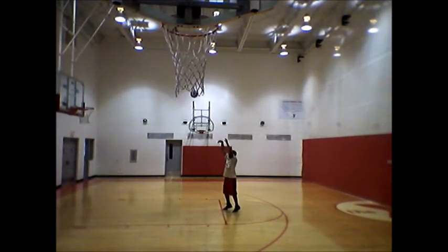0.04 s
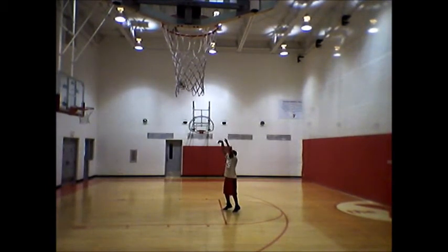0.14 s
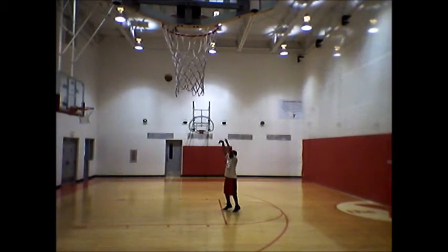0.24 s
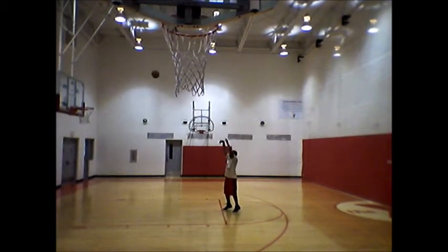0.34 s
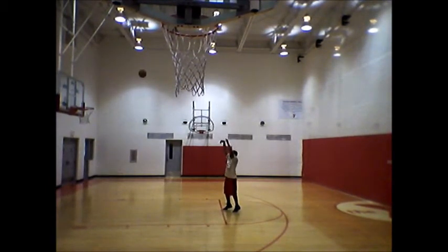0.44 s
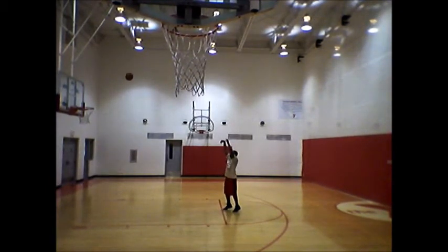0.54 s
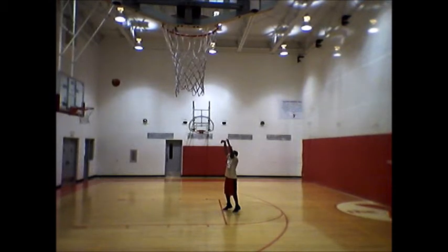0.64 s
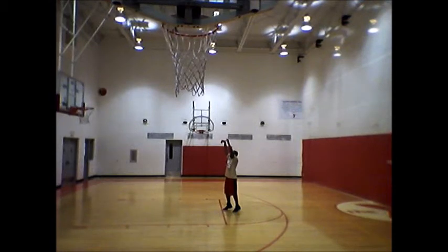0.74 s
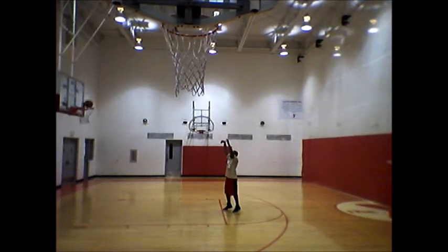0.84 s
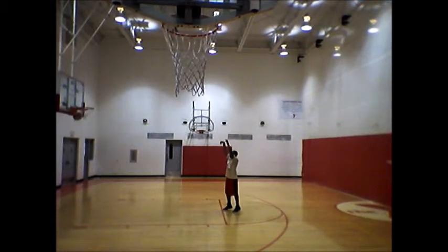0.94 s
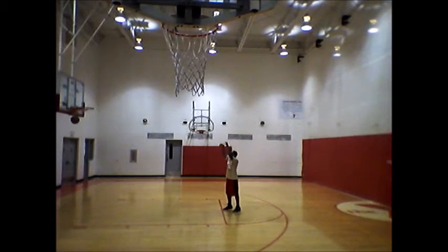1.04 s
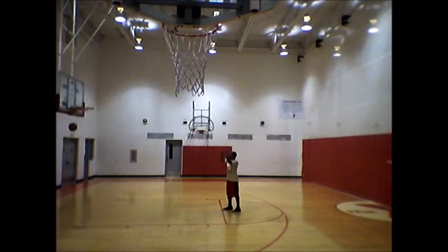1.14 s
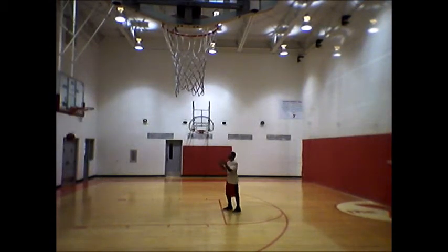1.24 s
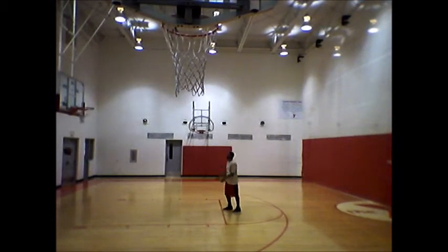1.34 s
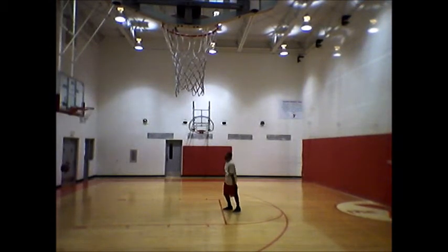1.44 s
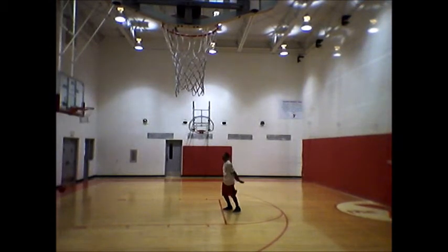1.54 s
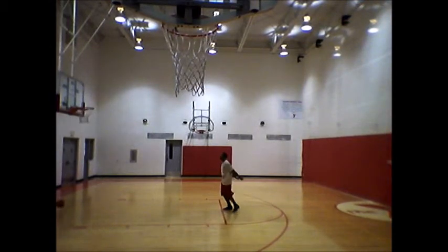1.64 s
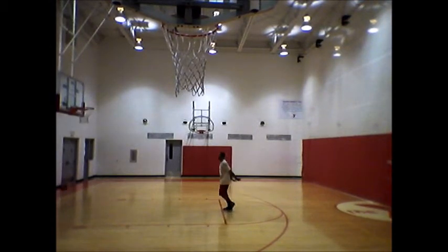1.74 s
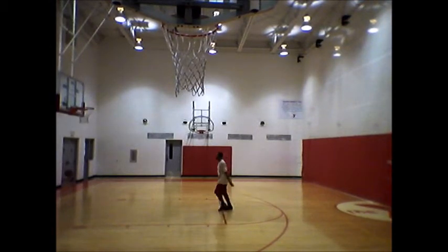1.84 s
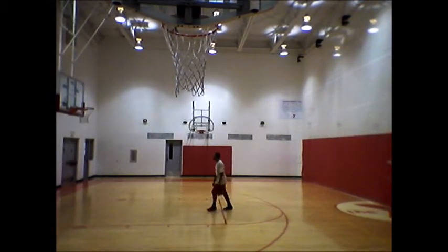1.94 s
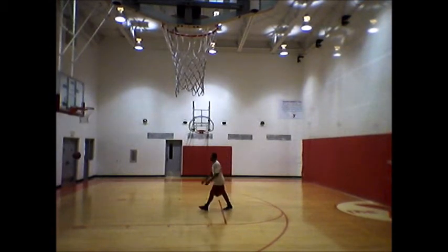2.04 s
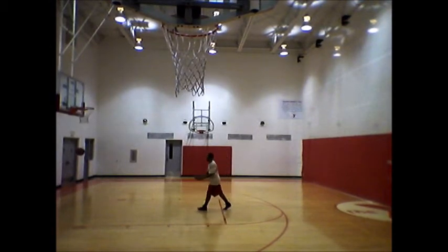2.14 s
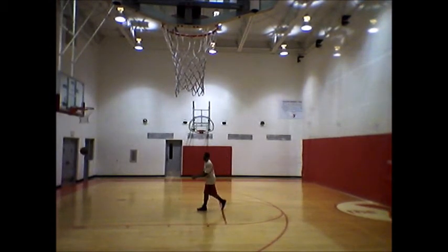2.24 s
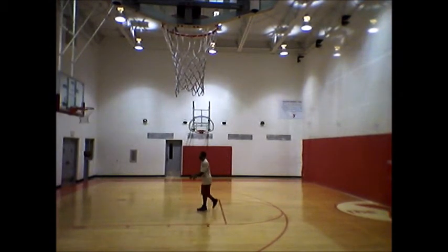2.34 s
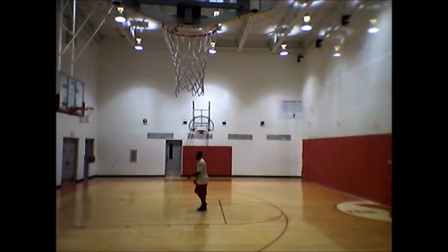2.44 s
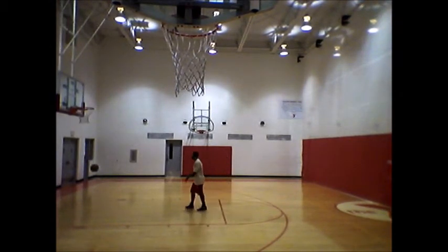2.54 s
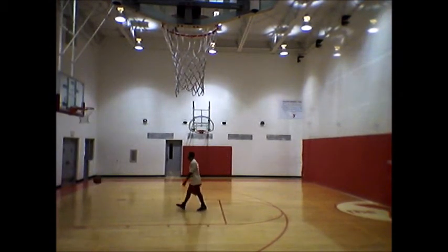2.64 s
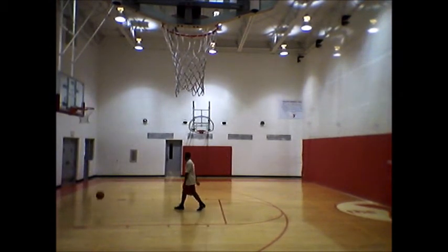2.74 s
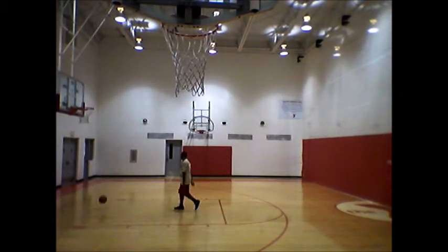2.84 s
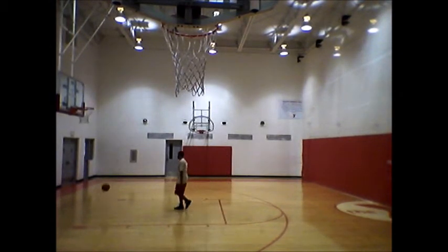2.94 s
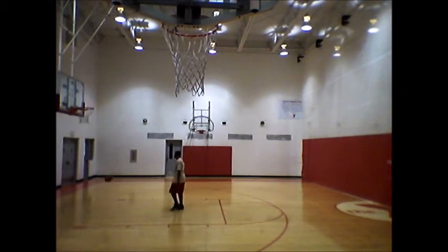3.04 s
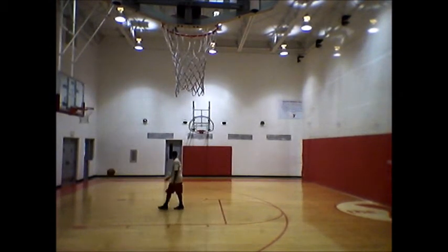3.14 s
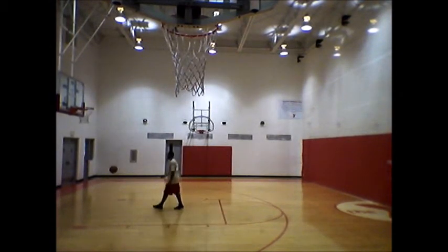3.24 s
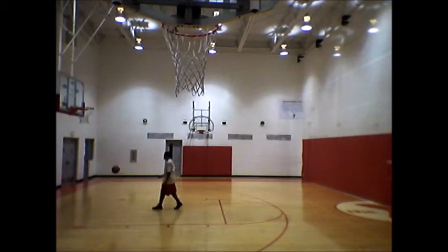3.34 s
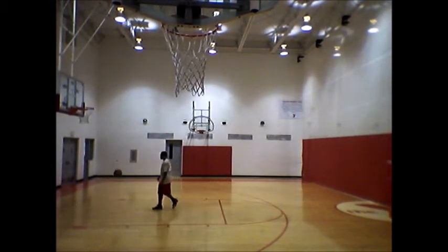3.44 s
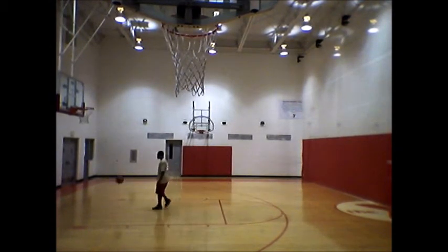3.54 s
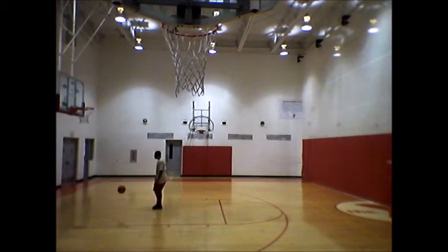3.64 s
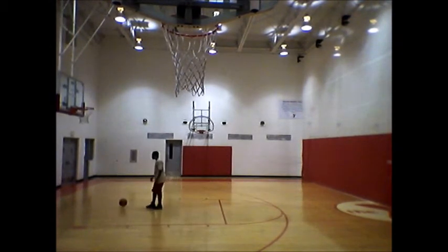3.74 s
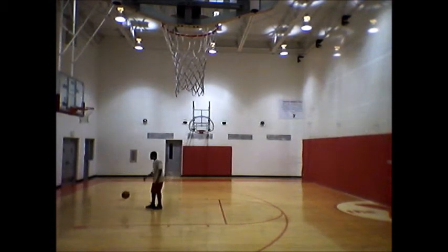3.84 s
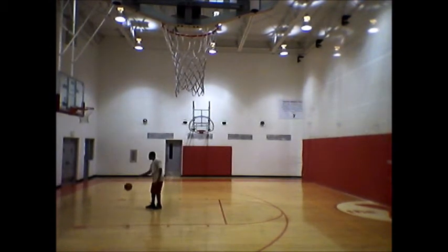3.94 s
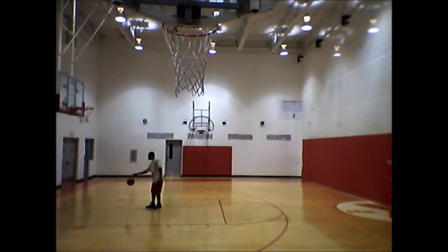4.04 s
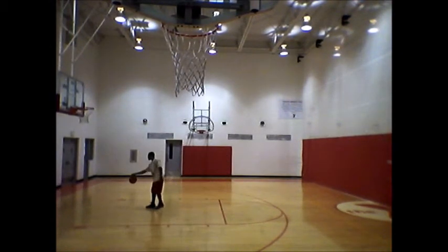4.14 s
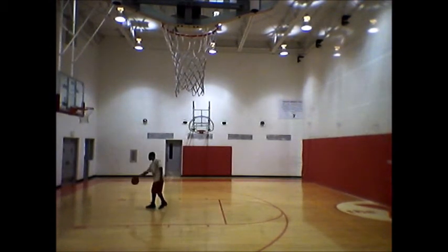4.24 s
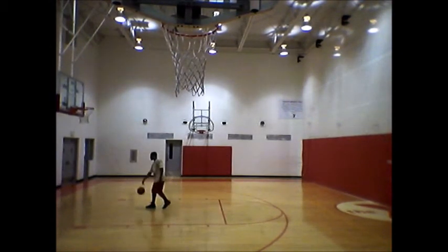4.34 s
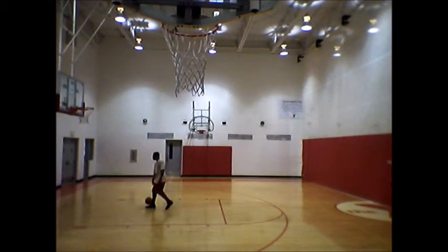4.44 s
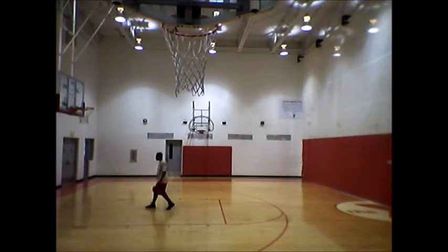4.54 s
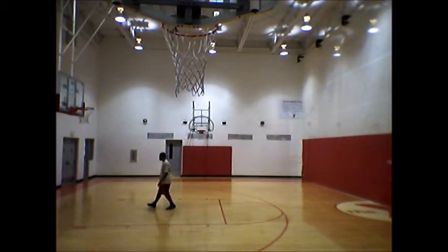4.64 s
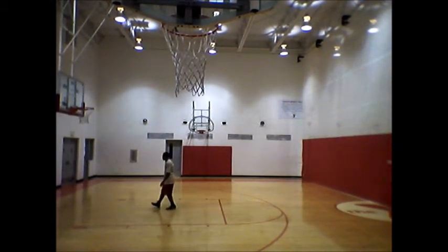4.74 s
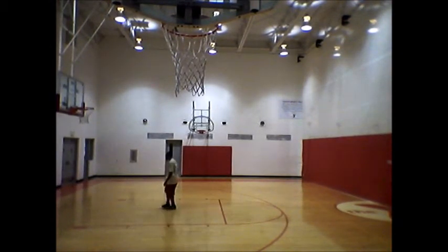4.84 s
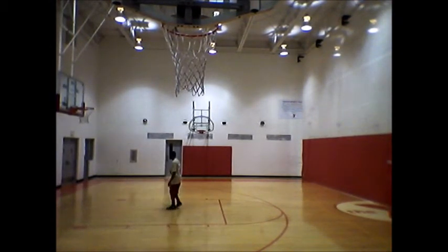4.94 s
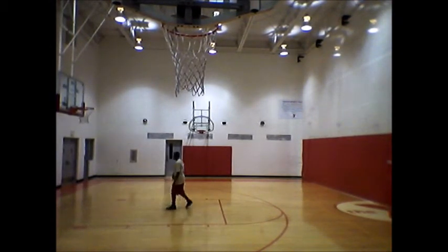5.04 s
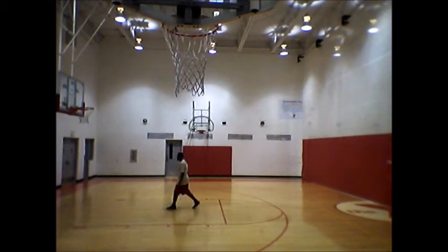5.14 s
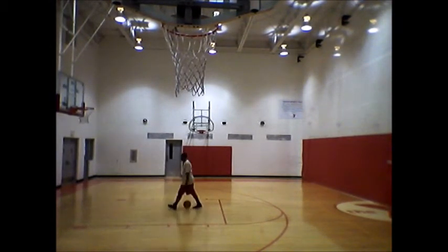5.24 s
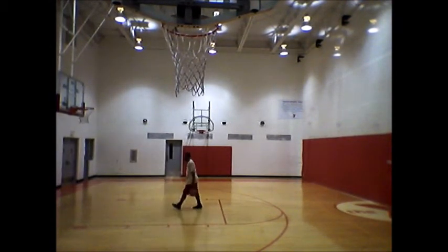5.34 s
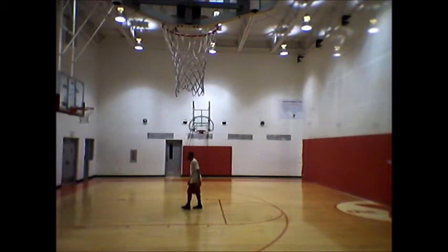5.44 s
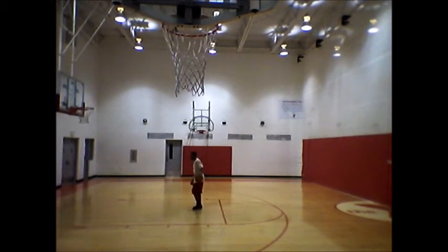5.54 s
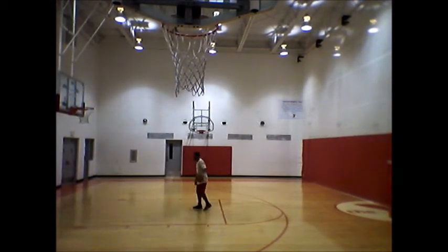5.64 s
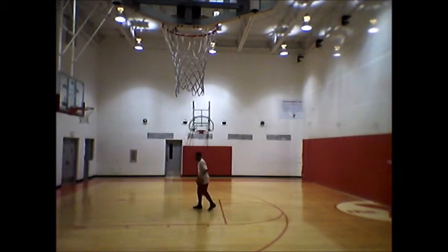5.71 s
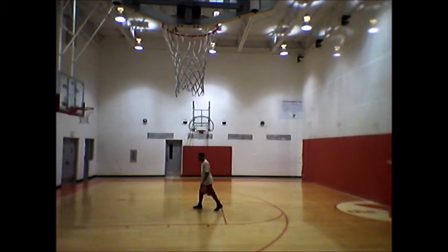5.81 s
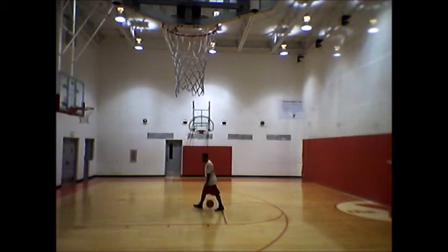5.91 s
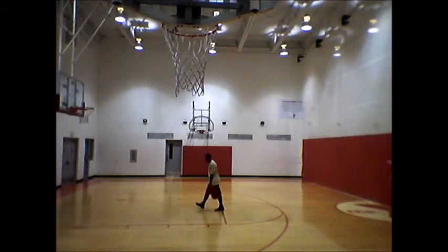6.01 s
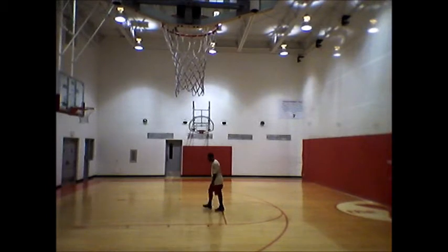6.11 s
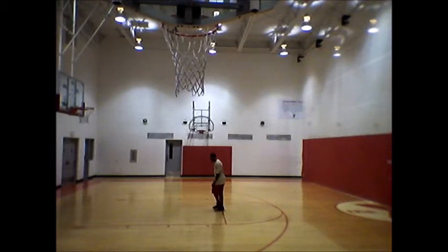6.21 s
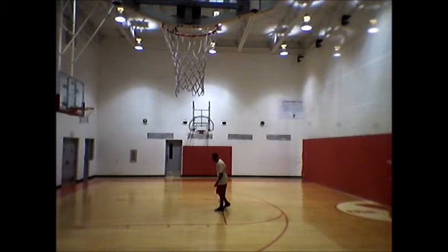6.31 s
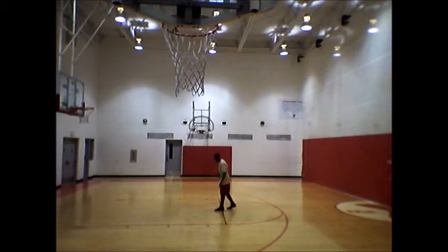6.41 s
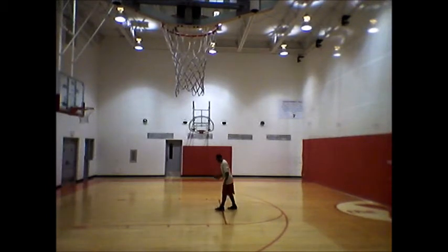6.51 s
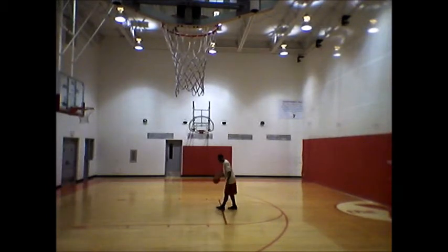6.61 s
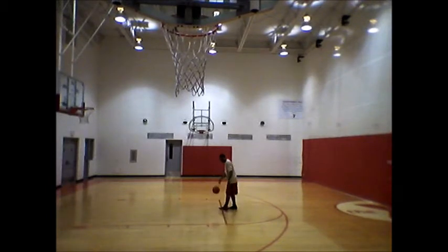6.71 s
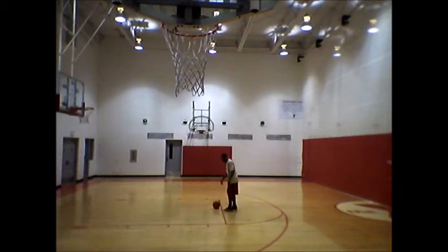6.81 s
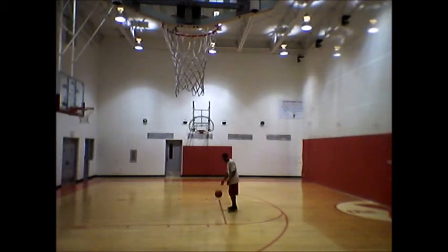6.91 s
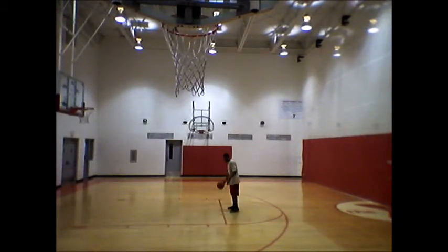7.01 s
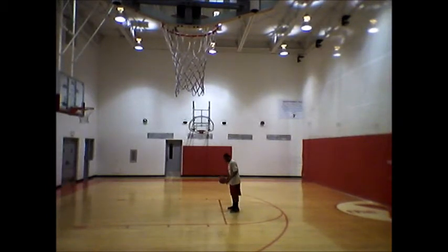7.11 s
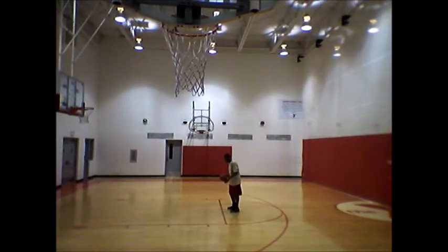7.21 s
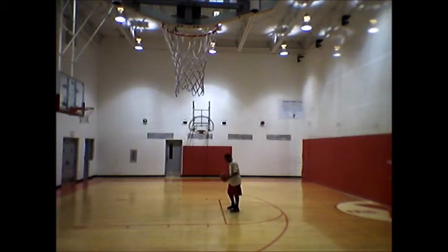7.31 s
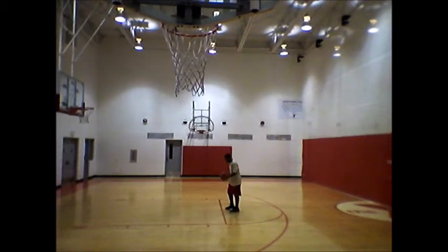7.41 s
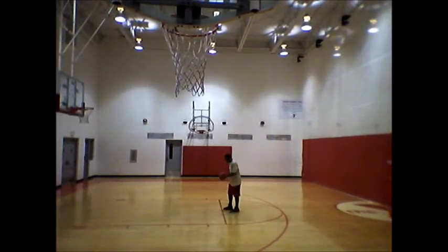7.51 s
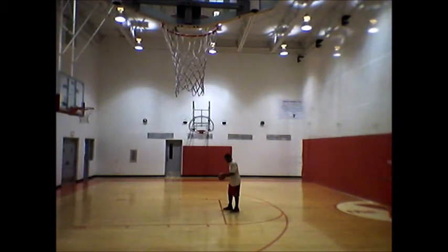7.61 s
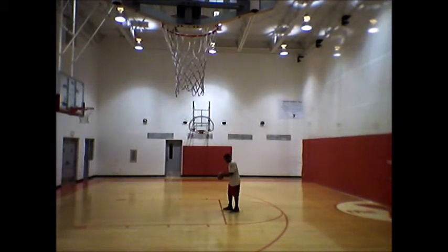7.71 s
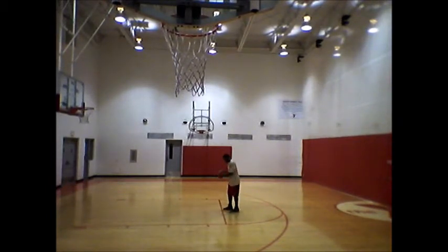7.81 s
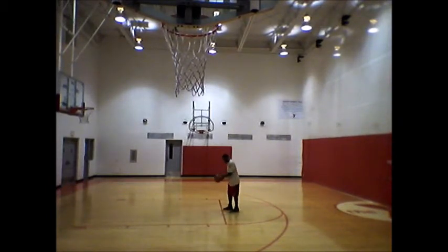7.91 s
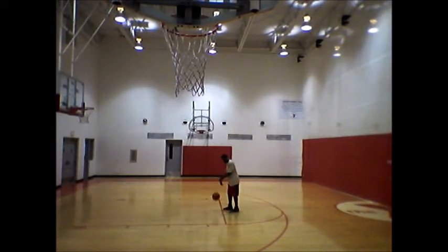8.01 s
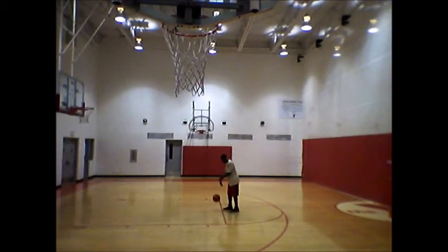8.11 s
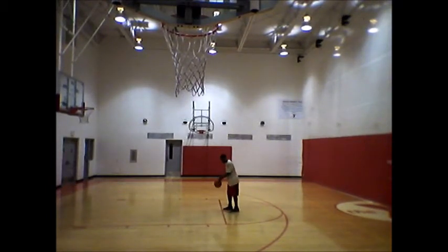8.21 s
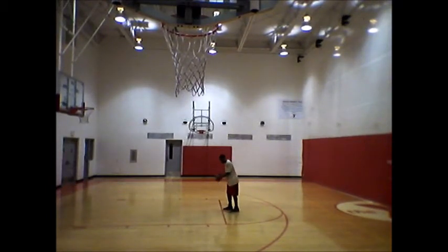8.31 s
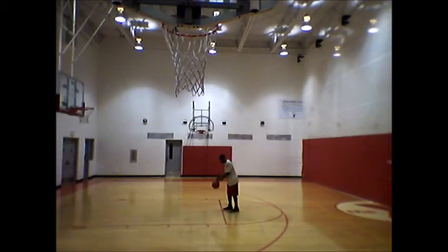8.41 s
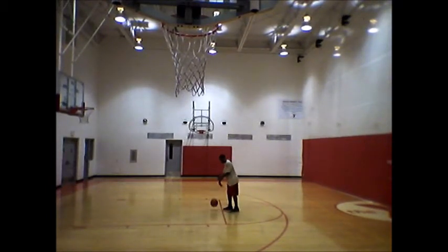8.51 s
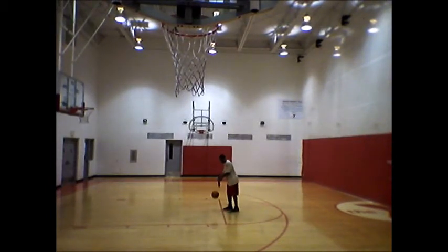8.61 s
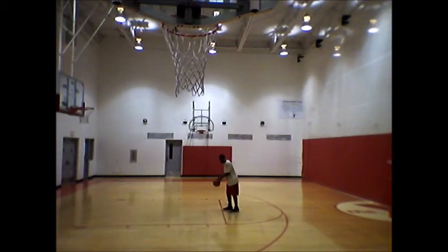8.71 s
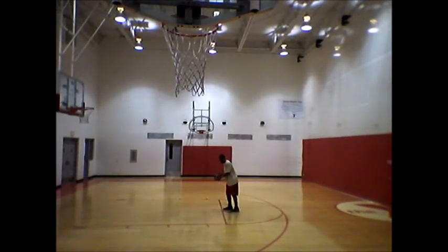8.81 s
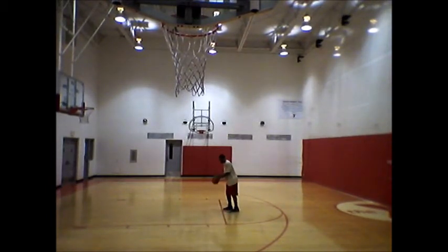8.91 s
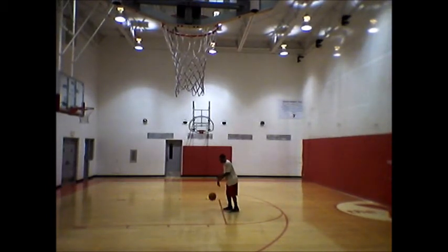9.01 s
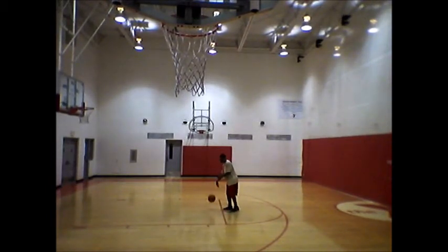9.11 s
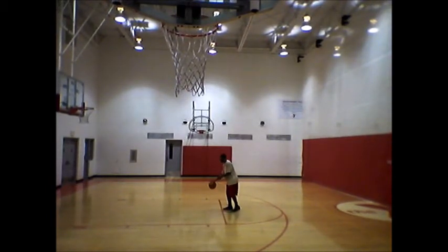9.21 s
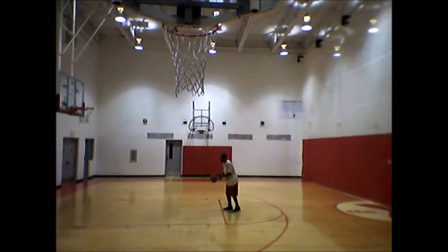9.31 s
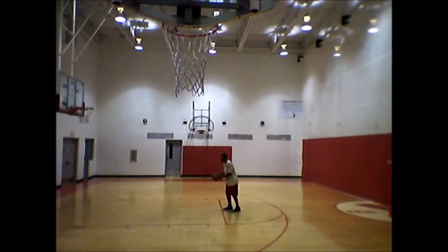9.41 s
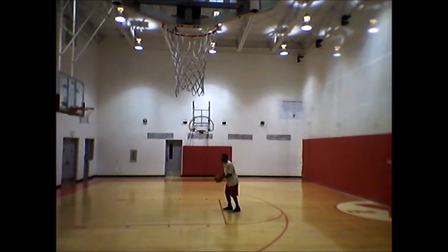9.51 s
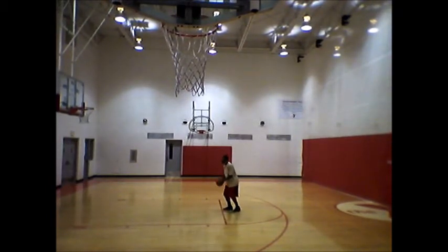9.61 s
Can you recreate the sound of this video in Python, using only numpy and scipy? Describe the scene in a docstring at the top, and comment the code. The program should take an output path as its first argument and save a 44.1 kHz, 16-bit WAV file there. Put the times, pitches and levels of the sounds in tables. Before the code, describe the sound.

A distant backboard rattles, then single basketball bounces smack a wood floor, each with a hollow ping and long gym reverberation above ventilation rush.

```python
"""A basketball hits a backboard at the side wall of a large empty gym, drops, bounces back and is dribbled.
Each bounce is a sharp slap, a thud of the wooden floor and a ping of the air in the ball, made from
short shaped pulses and damped sines. Delayed copies make wall echoes, fading noise the long reverberation.
The backboard clatters and rings; behind it all are a rush of air (shaped noise), lamp hum (sines) and hiss.
A small mono microphone cuts the bass and overloads on the slaps."""
import sys
import numpy as np
from scipy import signal
from scipy.fft import rfft, irfft
from scipy.io import wavfile

SR = 44100
rng = np.random.default_rng(int(sys.argv[2]) if len(sys.argv) > 2 else 0)


def put_to_file(sound):
    """Save the sound as 16-bit audio at rate SR, in the file named by the first command-line argument."""
    columns = np.atleast_2d(sound).T  # one column per channel
    safe = np.clip(columns, -1, 1)
    whole_steps = np.round(safe * 32767)
    wavfile.write(sys.argv[1], SR, whole_steps.astype(np.int16))


N = 426006

# ball on the floor, one row a bounce: (t/s, place from 0 at the side wall to 1 at the shooting spot,
# whole bounce level/dB, then boosts of the floor's low boom/dB, middle boom/dB, high boom/dB,
# hollow tone/dB, board knock/dB and slap/dB, strength of the ball's cavity/dB,
# boost of the ping/dB, ping f/Hz, direct sound level/dB, boosts of first echoes/dB and far echoes/dB,
# stray echo delay/s, stray echo level/dB)
BOUNCE_TABLE = [ (1.7423, 0.0076, 16.94, 0.5, 1.5, 3.5, -2, -1.2, -0.9, 0.91, 6.5, 913, -0.13, 0.76, -1, 0.12, -13),
                (2.9189, 0.27, 11.65, -0.5, -3, 0.5, -4, -1, 2, 2.3, 2, 1010, -2.6, 2.4, 0, .0720, -2),
                (3.8743, 0.35, 9.14, 1, -2, 4, -7.5, 0, 3, 1.1, 1, 1020, -1, 2.3, -1, 0.077, -5),
                (4.5435, 0.48, 10.6, 3.5, 3.5, 0.5, -1.5, -1, 3.5, 3.7, 7.5, 1032, -1.1, 1.6, -2, .0787, -6),
                (5.3484, 0.88, 13.76, 14, 6.5, 3, -2.5, 3, -3.5, 0.3, 5, 1013, 0.24, -1.4, -2, 0.11, -4.5),
                (6.0276, 0.98, 10.7, 8.5, 9.5, 4.4, 1, 4.5, -0.9, 0.5, 2, 1032, 0.53, 0.84, -1.5, 0.064, -3),
                (6.9130, 0.91, 10, 7, 5.5, 6, -12, 1, 1.5, 1.4, 2.5, 1030, 1.1, 0.79, -3, .0580, -10),
                (8.1576, 0.95, 15.2, 4.5, 1.2, 4, 0.5, -3, 2.5, 3.5, 7, 953, -0.31, -1.4, -3.5, .0848, -10),
                (8.68, 0.96, 14.26, -0.3, 2, 6, -6, -1, -0.8, 1.4, -1, 1046, -0.19, -0.4, -3.3, .0580, -10),
                (9.209, 0.88, 15.4, 3, 3, 6, -4.5, 2.5, 3, 0.79, -2, 1200, -1.4, 0.47, -0.5, 0.08, -17)]
# tone colour of the ball meeting the wood: (f/Hz, relative level/dB)
CONTACT_COLOUR = [(30, -24), (60, -17.5), (125, 0), (230, -2.5), (400, 1), (520, -1.8), (800, 1.7),
                  (1020, 7.5), (1450, 2.9), (2500, 0), (3400, -4), (5100, -5), (6100, -14), (8200, -20),
                  (11000, -36), (15000, -75)]
# bands of the floor that each spot drives differently, low boom to slap as above: (f/Hz, width/octaves)
FLOOR_BAND_TABLE = [(228, .27), (338, .13), (422, .13), (868, .097), (1440, .22), (4200, .72)]
# the ball's cavity lifts some bands and swallows others: (f/Hz, width/octaves, share of the cavity dB)
CAVITY_BAND_TABLE = [(555, .13, -.5), (700, .09, .5), (1030, .07, .5), (1440, .06, -.9), (1740, .09, .7),
                     (2130, .06, -.7), (2500, .08, .4), (3100, .07, -.3), (3530, .06, .4)]
# sprung floor and ball shell ringing: (f/Hz, level/dB, t60/s)
FLOOR_RING = [(241.5, -63, 0.11), (355, -60, 0.2), (427, -48, 0.16)]
# air ringing inside the ball: (f/Hz, level/dB, t60/s)
BALL_AIR_RING = [(925, -59, .18), (1017, -57, .17), (1599, -59, .2), (1690, -59, .16), (2725, -63, .22),
                 (3305, -66, .22), (3575, -66, .25)]
# thud of the floor and crack of the ball's skin, on the direct path only: (f/Hz, level/dB, t60/s)
THUD_AND_CRACK = [(282, -40.5, 0.041), (2540, -28, 0.007)]
# the ball rings, probably as it is caught: (t/s, length/s, start f/Hz, end f/Hz, level/dB)
CATCH_NOTE = (8.345, .095, 948, 915, -26.5)

# ball on the backboard, which rattles in its frame: (t/s, level/dB)
BOARD_TOUCHES = [(1.003, -2), (1.008, -6), (1.014, 1), (1.020, 2), (1.030, -2), (1.040, 8), (1.052, -2),
                 (1.067, 1.5), (1.098, -1), (1.117, -2)]
# tone colour of the backboard's clatter: (f/Hz, relative level/dB)
CLATTER_COLOUR = [(100, -21), (280, -9.5), (390, 17.5), (500, 2), (600, 5), (740, 10), (850, 6), (950, 8.5),
                  (1300, 11.5), (1550, -2), (1700, 2), (2000, -11), (3000, -15), (5300, -16), (7000, -27),
                  (12000, -74)]
# the backboard's ring: (f/Hz, level/dB before the mix raises it, t60/s)
BOARD_RING = [(392, -33, .22), (680, -49, .2), (770, -46, .22), (925, -46, .22), (1141, -48, .18),
              (1285, -47, .18), (1690, -53, .25), (2902, -56, .25), (3984, -61, .25)]
# tone colour of the net and loose fittings shaken by the shot: (f/Hz, relative level/dB)
RATTLE_COLOUR = [(500, -20), (1800, 3), (3000, 3), (5200, 5.5), (6500, -5), (8500, -18), (12000, -81)]

# first echoes off walls and ceiling, ball at the wall or the spot:
# (delay at wall/s, delay at spot/s, level at wall/dB, level at spot/dB)
FIRST_ECHOES = [(.0066, .0187, -1.5, -4), (.0240, .0161, -3, -3.5), (.0346, .0499, -6, -1.5),
                (.0555, .0576, -4.5, -6.5), (.0654, .0645, -9, -3.5), (.0740, .0849, -8, -8)]
# later echoes from across the hall:
# (delay at wall/s, delay at spot/s, level at wall/dB, level at spot/dB)
LATER_ECHOES = [(.0985, .0935, -12, -14), (.1166, .1168, -8, -11), (.1200, .1208, -10, -10.5),
                (.1285, .1352, -10, -11.5), (.1760, .1765, -11.5, -15)]
# how long the gym's reverberation takes to fall by 60 dB: (f/Hz, t60/s)
GYM_DECAY = [(100, 5.05), (250, 2.64), (550, 1.32), (1100, 2.09), (2200, 2.59), (4500, 2.39), (8000, 1.7),
             (14000, 0.23)]

# tone colour of the air handling: (f/Hz, relative level/dB per Hz)
VENTILATION_COLOUR = [(30, -29), (70, -18), (120, -3), (170, -7.5), (240, 0.5), (290, -1), (370, 2.5),
                      (480, -1.5), (680, 1), (920, -2.5), (1120, 0.5), (1400, -7.5), (3200, -13.5),
                      (4900, -16), (7000, -28), (14000, -88)]
# lamp hum: (multiple of the ballast hum, rms level/dB)
LAMP_HUM = [(1, -67.5), (2, -46.5), (19, -60.5), (21, -72)]
# the lamps' faint buzz, high tones that share one level: multiples of the ballast hum
LAMP_BUZZ = [39, 42, 43, 48, 49, 52, 54]

SIZE = 2 ** 17  # samples in one hit with its reverberation
AGE = np.arange(SIZE) / SR  # seconds since the hit
HZ = np.fft.rfftfreq(SIZE, 1 / SR) + 1  # the 1 keeps logarithms finite

# the strongest ring of the ball's air, before each bounce's own boost
PING_BASE_DB, PING_T60_S = -42.5, .1
RATTLE_DB, RATTLE_PER_S, RATTLE_PEAK_S = 3, 700, 0.036
# reverberation: strength and time to swell, by the ball's place
HALL_AT_WALL_DB, HALL_AT_SPOT_DB = 2.5, 0.73
SWELL_AT_WALL_S, SWELL_AT_SPOT_S = 0.039, 0.023
# its return from the far end: delay, spread, and height before half the far echoes' boost is added
RETURN_S, RETURN_WIDTH_S, RETURN_BASE_DB = 0.14, 0.045, 2.16
# walls return little bass; long paths lose their treble
ECHO_BASS_HZ, AIR_CUT_HZ = 150, 8100
VENTILATION_DB, BUZZ_DB, HISS_DB = -40.5, -68.5, -66
HUM_HZ = 119.99  # lamp ballasts hum at twice the mains frequency
CUTOFF_HZ = 15000


def bounces():
    """Ball on wood: a slap coloured by floor spot and cavity, with ringing floor and air, heard in the gym."""
    out = np.zeros(N)
    floor = np.array([bump(hz, octaves) for hz, octaves in FLOOR_BAND_TABLE])
    cavity = sum(share * bump(hz, octaves) for hz, octaves, share in CAVITY_BAND_TABLE)
    for (s, place, db, *floor_db, cavity_db, ping_db, ping_hz,
         direct_db, echo_db, far_db, stray_s, stray_db) in BOUNCE_TABLE:
        colour_db = np.dot(floor_db, floor) + cavity_db * cavity
        hit = impact(CONTACT_COLOUR, colour_db)
        hit += ring(FLOOR_RING, spread_db=2.5)
        hit += ring(BALL_AIR_RING, spread_db=4.0)
        hit += ring([(ping_hz, PING_BASE_DB + ping_db, PING_T60_S)], spread_db=0.5)
        hall_db = between(place, HALL_AT_WALL_DB, HALL_AT_SPOT_DB)
        heard = gym(hit, place, hall_db, direct_db=direct_db, direct_s=0.0025,
                    echo_db=echo_db - 2.0, far_db=far_db, surge_db=RETURN_BASE_DB + .5 * far_db,
                    scatter_db=-2.0, scatter_s=0.003, strays=[(stray_s, stray_db)])
        add(out, s, from_db(db) * (heard + ring(THUD_AND_CRACK, spread_db=5.5)))
    return out


def hand_note():
    """A brief, slightly falling note, probably the ball ringing as the hand takes it."""
    s, length_s, start_hz, end_hz, db = CATCH_NOTE
    part = np.linspace(0, 1, round(length_s * SR))
    pitch_hz = start_hz + (end_hz - start_hz) * part
    phase = 2 * np.pi * np.cumsum(pitch_hz) / SR
    out = np.zeros(N)
    add(out, s, from_db(db) * np.sin(np.pi * part) * np.sin(phase))
    return out


def backboard():
    """The shot strikes the far backboard, which clatters and rings, heard mostly through the hall."""
    touches, first_s = np.zeros(SIZE), BOARD_TOUCHES[0][0]
    for s, db in BOARD_TOUCHES:
        add(touches, s - first_s, from_db([db]))
    # the first touch sets the panel ringing; every touch clatters
    clatter = signal.fftconvolve(touches, impact(CLATTER_COLOUR))[:SIZE]
    panel = from_db(11.0) * ring(BOARD_RING, spread_db=1)
    # the stiff panel radiates little bass
    bass_cut = signal.butter(2, 220, "high", fs=SR, output="sos")
    sound = signal.sosfilt(bass_cut, clatter + panel + rattle())
    heard = gym(sound, place=0, hall_db=-4.0, direct_db=-1.5, direct_s=0.0069, echo_db=-12.0,
                far_db=-15.0, surge_db=1.0, scatter_db=3.0, scatter_s=0.0023)
    out = np.zeros(N)
    add(out, first_s, heard)
    return out


def rattle():
    """Loose fittings and the net shake: a swarm of tiny random ticks that swells and dies."""
    ticks = rng.standard_normal(SIZE) * (rng.random(SIZE) < RATTLE_PER_S / SR)
    ticks *= AGE * np.exp(-AGE / RATTLE_PEAK_S)
    swarm = rms_one(ticks) / np.sqrt(SIZE)  # energy 1
    return from_db(RATTLE_DB) * signal.fftconvolve(swarm, impact(RATTLE_COLOUR))[:SIZE]


def gym(sound, place, hall_db, direct_db, direct_s, echo_db, far_db, surge_db, scatter_db, scatter_s,
        strays=()):
    """Sound reaches the microphone directly, by echoes and as reverberation; long paths lose treble."""
    # from the far side of the hall the reverberation takes longer to swell
    build_s = between(place, SWELL_AT_WALL_S, SWELL_AT_SPOT_S)
    late = from_db(hall_db) * reverberation(early_db=16.0, early_t60=0.34, late_db=12.0, build_s=build_s,
                                            grain_s=.17, clump_db=1.28, surge_db=surge_db)
    late += from_db(far_db) * echoes(LATER_ECHOES, place, scatter_db, scatter_s)
    # some surfaces throw a bunch of echoes back only from one particular spot
    for delay_s, db in strays:
        bunch = cluster(width_s=0.0054)
        add(late, delay_s - len(bunch) / SR / 2, from_db(db) * bunch)
    paths = signal.sosfilt(signal.butter(8, AIR_CUT_HZ, fs=SR, output="sos"), late)
    paths += from_db(echo_db) * echoes(FIRST_ECHOES, place, scatter_db, scatter_s)
    # the struck surface flexes and keeps radiating for a few milliseconds
    add(paths, 0, from_db(direct_db) * splash(db=4.0, decay_s=direct_s))
    return signal.fftconvolve(sound, paths)[:SIZE]


def echoes(table, place, scatter_db, scatter_s):
    """Echoes follow the ball's place; wall fittings smear each one, the more so the longer its path."""
    out = np.zeros(SIZE)
    for wall_s, spot_s, wall_db, spot_db in table:
        delay_s = between(place, wall_s, spot_s)
        gain = from_db(between(place, wall_db, spot_db))
        add(out, delay_s, gain * splash(scatter_db + 30 * delay_s, scatter_s))
    return signal.sosfilt(signal.butter(1, ECHO_BASS_HZ, "high", fs=SR, output="sos"), out)


def splash(db, decay_s):
    """A click trailed by a short dense burst of smaller ones (db: burst against click); energy 1."""
    t = AGE[:SR // 40]
    noise = rng.standard_normal(len(t)) * np.exp(-t / decay_s)
    # keep only the phases, so that all pitches are equally strong
    even = irfft(np.exp(1j * np.angle(rfft(noise))), len(t))
    burst = from_db(db) * rms_one(even * np.exp(-t / (2 * decay_s))) / np.sqrt(len(t))
    burst[0] += 1
    return burst / np.sqrt(np.sum(burst ** 2))


def cluster(width_s):
    """A dense bunch of small reflections that swells and fades; energy 1."""
    t = AGE[:SR // 25]
    bunch = rng.standard_normal(len(t)) * np.exp(-.5 * ((t - t[-1] / 2) / width_s) ** 2)
    return rms_one(bunch) / np.sqrt(len(t))


def reverberation(early_db, early_t60, late_db, build_s, grain_s, clump_db, surge_db):
    """Scattered reflections crowd together with time; an early part dies first, each octave at its own rate."""
    density = np.clip(.06 + (AGE / grain_s) ** 2, 0.001, 1)
    clicks = rng.standard_normal(SIZE) * (rng.random(SIZE) < density) / np.sqrt(density)
    arrivals = rfft(clicks)
    # split into overlapping octave bands and let each fade
    centres = np.geomspace(70, 17920, 9)
    out = np.zeros(SIZE)
    for hz, share in zip(centres, np.eye(len(centres))):
        band = irfft(arrivals * np.interp(np.log(HZ), np.log(centres), share))
        out += band * fade(AGE, at_hz(GYM_DECAY, hz))
    early = from_db(early_db) * fade(AGE, early_t60)
    # reflections come in clumps: a random level that evens out with time
    knots = AGE[::400]
    wander = np.interp(AGE, knots, rng.standard_normal(len(knots)))
    clumps = from_db(clump_db * np.exp(-AGE / 0.7) * wander)
    # the sound swells once more as it comes back from the far end of the hall
    surge = from_db(surge_db * np.exp(-.5 * ((AGE - RETURN_S) / RETURN_WIDTH_S) ** 2))
    swell = 1 - np.exp(-AGE / build_s)
    return out * clumps * surge * np.hypot(early, from_db(late_db)) * swell / np.sqrt(SR)


def ventilation():
    """A steady rush of air: noise shaped to the colour of the air handling."""
    colour = from_db(at_hz(VENTILATION_COLOUR, np.fft.rfftfreq(N, 1 / SR) + 1))
    rush = irfft(rfft(rng.standard_normal(N)) * colour, N)
    return from_db(VENTILATION_DB) * rms_one(rush)


def lamps(waver_db):
    """Ballasts hum and buzz at multiples of one pitch, each tone wavering a little in level."""
    t, out = np.arange(N) / SR, np.zeros(N)
    knots = np.linspace(0, t[-1], 60)
    tones = list(LAMP_HUM) + [(multiple, BUZZ_DB) for multiple in LAMP_BUZZ]
    for multiple, db in tones:
        wavering_db = db + waver_db * rng.standard_normal(len(knots))
        gain = np.interp(t, knots, from_db(wavering_db))
        cycles = round(multiple) * HUM_HZ * t + rng.random()
        out += np.sqrt(2) * gain * np.sin(2 * np.pi * cycles)  # root 2 turns rms into peak
    return out


def microphone_hiss():
    """The microphone's own faint hiss: plain noise, equally strong at all pitches."""
    return from_db(HISS_DB) * rng.standard_normal(N)


def impact(spectrum, colour_db=0):
    """The most compact causal pulse with this spectrum (minimum phase); energy 1 before colouring."""
    gain = rms_one(from_db(at_hz(spectrum, HZ))) * from_db(colour_db)
    # folding the cepstrum forward in time moves the energy to the start
    cepstrum = irfft(np.log(gain))
    cepstrum[1:SIZE // 2] *= 2
    cepstrum[SIZE // 2 + 1:] = 0
    return irfft(np.exp(rfft(cepstrum)))


def ring(modes, spread_db):
    """A struck body rings as damped sines, each with a random strength around its level; lasts 1 s."""
    t, out = AGE[:SR], np.zeros(SIZE)
    for hz, db, t60 in modes:
        strength = from_db(db + spread_db * rng.standard_normal())
        out[:SR] += strength * fade(t, t60) * np.sin(2 * np.pi * hz * t)
    return out


def fade(t, t60):
    """Exponential decay that falls by 60 dB in t60 seconds."""
    return np.exp(-np.log(1000) * t / t60)


def from_db(db):
    """Decibels to gain."""
    return 10 ** (np.asarray(db) / 20)


def rms_one(x):
    """Scale to rms 1."""
    return x / np.sqrt(np.mean(x ** 2) + 1e-20)


def at_hz(points, hz):
    """Read a (f/Hz, value) table on a log-frequency axis."""
    known_hz, values = np.transpose(points)
    return np.interp(np.log(hz), np.log(known_hz), values)


def bump(centre_hz, octaves):
    """A bell of height 1 on the log-frequency axis."""
    return np.exp(-.5 * (np.log2(HZ / centre_hz) / octaves) ** 2)


def between(place, at_wall, at_spot):
    """A value that changes evenly with the ball's place."""
    return np.interp(place, [0, 1], [at_wall, at_spot])


def add(track, s, sound):
    """Mix a sound into a track from time s on."""
    start = max(round(s * SR), 0)
    part = sound[:len(track) - start]
    track[start:start + len(part)] += part


def scene():
    """All sources together; one microphone feeds both channels."""
    ball = bounces() + hand_note()
    background = ventilation() + lamps(waver_db=2.0) + microphone_hiss()
    return np.tile(ball + backboard() + background, (2, 1))


def record(dry):
    """The small microphone drops deep bass, its input overloads on loud slaps, and both ends are cut."""
    thin = signal.sosfilt(signal.butter(2, 95, "high", fs=SR, output="sos"), dry)
    # nearly straight for quiet sound, flattening towards 1
    clipped = thin / (1 + thin ** 8) ** (1 / 8)
    coupled = signal.sosfilt(signal.butter(1, 45, "high", fs=SR, output="sos"), clipped)
    return signal.sosfilt(signal.ellip(10, .1, 80, CUTOFF_HZ, fs=SR, output="sos"), coupled)


dry = scene()
out = record(dry)
put_to_file(out)
```